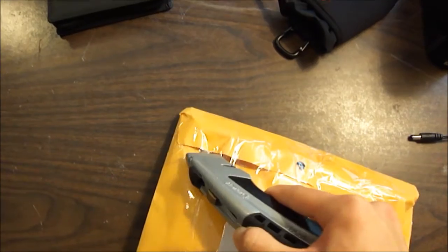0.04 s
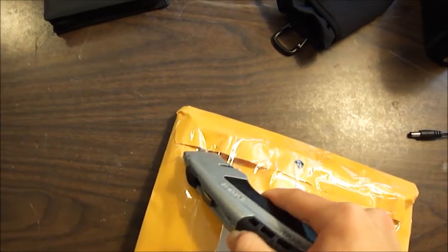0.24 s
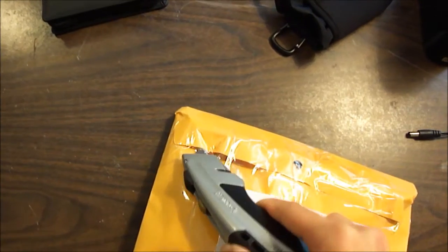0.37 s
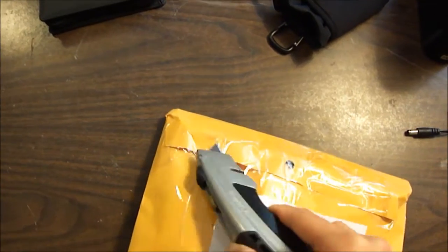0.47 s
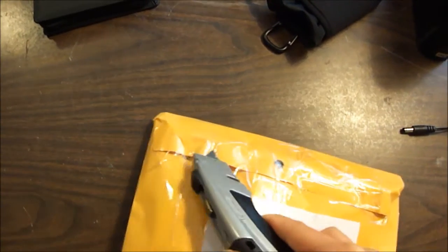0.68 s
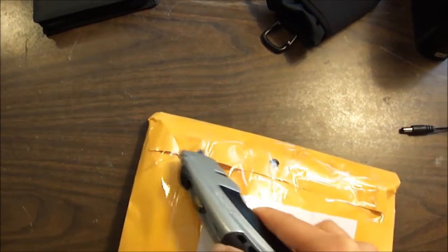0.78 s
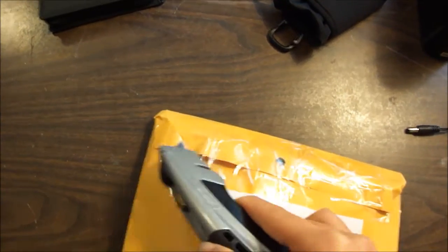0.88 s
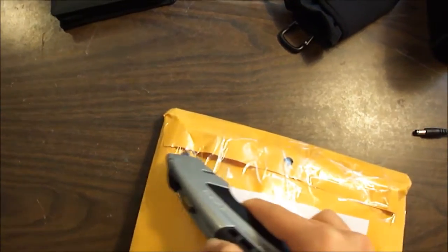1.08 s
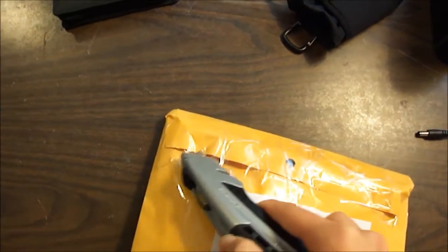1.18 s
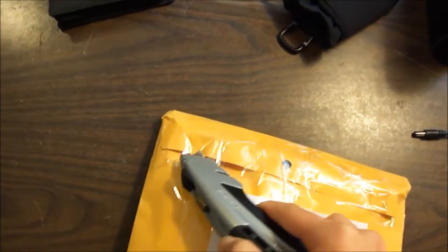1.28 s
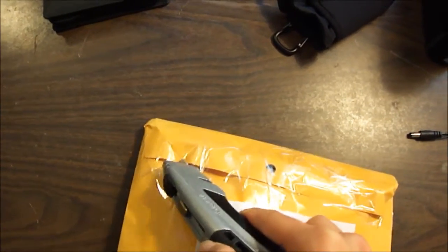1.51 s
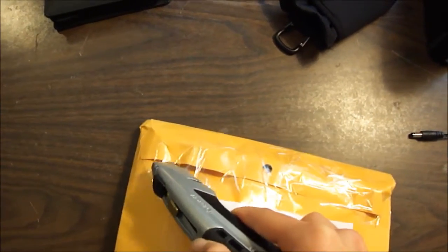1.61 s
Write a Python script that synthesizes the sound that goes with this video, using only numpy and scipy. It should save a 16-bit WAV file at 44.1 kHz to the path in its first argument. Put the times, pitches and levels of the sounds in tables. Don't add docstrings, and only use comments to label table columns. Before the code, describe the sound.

Paper and tape being cut open with a utility knife, sparse ticks building to a loud ripping crackle, then irregular snaps and softer rustling on a table, recorded close with faint steady room hiss.

```python
import sys
import numpy as np
from scipy import signal
from scipy.fft import rfft, irfft
from scipy.io import wavfile
from scipy.ndimage import uniform_filter1d

SR = 44100
rng = np.random.default_rng(int(sys.argv[2]) if len(sys.argv) > 2 else 0)


def gain_from_decibels(decibels):
    exponent = np.asarray(decibels, float) / 20
    return 10 ** exponent


def generate_wav(signal):
    frames = np.transpose(np.atleast_2d(signal))
    scaled = np.clip(frames, -1, 1) * 32767
    pcm = np.round(scaled).astype(np.int16)
    wavfile.write(sys.argv[1], SR, pcm)


N = 72765


def evened(x):
    return x / np.sqrt(np.mean(x ** 2) + 1e-20)


def peaked(x, db):
    return gain_from_decibels(db) * x / abs(x).max()


def add(mix, start_s, sound):
    start = max(round(start_s * SR), 0)
    part = mix[start:][:len(sound)]
    part += sound[:len(part)]


def read(points, hz):
    point_hz, value = np.transpose(points)
    return np.interp(np.log(hz + 1), np.log(point_hz + 1), value)


def colour(x, points):
    hz = np.fft.rfftfreq(len(x), 1 / SR)
    return irfft(rfft(x) * gain_from_decibels(read(points, hz)), len(x))


def resonate(x, hz, width_hz):
    r = np.exp(-np.pi * width_hz / SR)
    return signal.lfilter([1 - r, 0, r - 1], [1, -2 * r * np.cos(2 * np.pi * hz / SR), r * r], x)


def band(x, low_hz, high_hz):
    return signal.lfilter(*signal.butter(2, [low_hz, high_hz], "band", fs=SR), x)


# pitch_hz, width_hz,
# level_db
ENVELOPE_MODES = [(995, 160, -4), (1190, 200, 2.5), (1463, 606, -3.5), (1837, 236, 2.5), (2270, 800, -10),
                  (3550, 33, -6.5), (524, 244, -9.5)]


def hollow(x):
    rung = np.zeros(len(x))
    for k, (hz, width_hz, db) in enumerate(ENVELOPE_MODES):
        sign = (-1) ** k
        rung += sign * gain_from_decibels(db) * resonate(x, hz, width_hz)
    return band(rung, 600, 4000)


# pitch_hz, level_db
AIR_NOISE = [(18, -63), (30, -32.5), (237, -6.5), (296, -3.5), (610, -3), (674, -7), (822, -1.5),
             (9660, -20), (11500, -18), (15000, -65), (22000, -120)]


def room_air():
    return gain_from_decibels(-50.5) * evened(colour(rng.standard_normal(N), AIR_NOISE))


def slips(per_s, spread_db):
    size = gain_from_decibels(spread_db * np.minimum(rng.exponential(1, N), 2.5))
    happens = rng.random(N) < per_s / SR
    return size * rng.standard_normal(N) * happens


# time_s, level_db
HAND_PRESSURE = [(0, -38), (.07, -52.5), (.16, -53), (.23, -89), (.25, -55), (.36, -43.5), (.48, -32.5),
                 (.56, -42.5), (.75, -42.5), (.83, -100), (.95, -51), (1.0, -46), (1.2, -37.5), (1.27, -82),
                 (1.33, -48), (1.42, -44), (1.57, -44), (1.62, -48)]
# start_s, length_s, fizz_db, body_db, fizz_hz
TEARS = [(0.371, 0.017, -38, -42, 4700), (1.14, 0.05, -46.5, -50, 5600), (1.388, 0.042, -47.5, -41, 5700),
         (1.524, 0.016, -50, -36.5, 6500), (0.386, 0.026, -22.5, -19, 7350),
         (0.4178, 0.011, -24, -19.5, 5900), (0.44, 0.019, -22.5, -18, 4560),
         (0.457, 0.093, -46.5, -37, 4770), (0.6222, 0.0036, -23.5, -27, 5230),
         (0.6523, 0.0084, -32, -31, 5600), (0.7539, 0.0056, -32, -38, 3550), (0.972, 0.014, -35, -28, 2610),
         (1.074, 0.011, -38.5, -25, 3670), (1.117, 0.027, -35, -28, 4860), (1.182, 0.012, -48, -27.5, 3350),
         (1.2, 0.0133, -57, -35, 4860), (1.643, 0.0054, -36, -32.5, 9300)]
# pitch_hz, level_db
FIZZ_TONE = [(1180, -91), (2000, -4), (2720, -1.5), (3510, 1.5), (4220, -3), (10500, -6.5), (11500, -15),
             (15000, -59), (22000, -120)]


def paper():
    t = np.arange(N) / SR
    clump_db = 2 * evened(uniform_filter1d(rng.standard_normal((2, N)), 300))
    clump = gain_from_decibels(clump_db)
    press = gain_from_decibels(np.interp(t, *np.transpose(HAND_PRESSURE)))
    body = press * evened(clump[0] * slips(per_s=4000, spread_db=3))
    scrape = evened(np.sqrt(clump[1]) * rng.standard_normal(N))
    fizz = gain_from_decibels(-5.5) * press * scrape

    tear_slips = evened(slips(per_s=8000, spread_db=2.5))
    for start_s, length_s, fizz_db, body_db, fizz_hz in TEARS:
        progress = np.clip((t - start_s) / length_s, 0, 1)
        swell = np.sqrt(np.sin(np.pi * progress ** .6).clip(0))
        tear = tear_slips * swell
        ring = gain_from_decibels(7) * resonate(tear, fizz_hz, width_hz=700)
        fizz = fizz + gain_from_decibels(fizz_db) * (tear + ring)
        body = body + gain_from_decibels(body_db) * tear

    click = np.eye(1, N, N // 2)[0]
    bare = colour(fizz, FIZZ_TONE) / np.linalg.norm(colour(click, FIZZ_TONE))
    boxed = hollow(body) / np.linalg.norm(hollow(click))
    shove = gain_from_decibels(-34) * np.std(body) * evened(band(body, 80, 170))
    return shove + bare + boxed


def swelling(u):
    return u * np.exp(1 - u)


# start_s, peak_db, pitch_hz
THUDS = [
    (0.01, -61, 40),
    (0.38, -48, 130),
    (0.464, -52, 71),
    (0.62, -62, 45),
    (0.685, -62, 45),
    (0.75, -63, 45),
    (0.85, -56, 65),
]


def thuds():
    out, t = np.zeros(N), np.arange(6000) / SR
    for start_s, peak_db, hz in THUDS:
        swell_s = 0.62 / 3 / hz
        add(out, start_s, gain_from_decibels(peak_db) * swelling(t / swell_s) * np.sin(2 * np.pi * hz * t))
    return out


# start_s, tick_db, body_db, tick_hz, body_hz
PIERCING_SNAPS = [(0.029, -26, -48, 4930, 1840), (0.0848, -32.5, -47, 6050, 1960),
                  (0.088, -31, -53, 3400, 1160), (0.1185, -23.5, -33, 10200, 2500),
                  (0.1265, -27, -34, 3100, 2000), (0.1396, -30.5, -40, 3450, 1310),
                  (0.2367, -12, -14, 4400, 2150), (0.2454, -26, -29, 3000, 1430),
                  (0.275, -29.5, -32, 5060, 1240), (0.2814, -27, -26, 3470, 1690),
                  (0.3075, -16.5, -33, 3650, 1130), (0.3138, -30, -26, 3480, 1140),
                  (0.3458, -20.5, -31, 3570, 1090), (0.3705, -33, -43, 4860, 1100),
                  (0.381, -15.5, -23.5, 9700, 1040), (0.4198, -5, -17, 5950, 1190),
                  (0.4374, -13, -15, 5000, 1920), (0.4733, -12.5, -17, 9700, 1290)]
# start_s, tick_db, body_db, tick_hz, body_hz
CUTTING_SNAPS = [(0.5633, -25, -27, 3940, 1000), (0.5715, -14.5, -21.5, 6520, 1330),
                 (0.5911, -9, -30, 6050, 1220), (0.6122, -32, -25, 3070, 2140),
                 (0.6214, -8.5, -27, 5250, 1270), (0.6472, -31, -23, 4720, 1640),
                 (0.6613, -8.5, -23.5, 6240, 1980), (0.6875, -16.5, -19, 4940, 2100),
                 (0.7058, -20, -46, 3540, 1190), (0.7195, -19, -23.5, 4000, 1040),
                 (0.7544, -9, -12, 4750, 2150), (0.8014, -33, -23, 3360, 712),
                 (0.8521, -23.5, -41, 3560, 870), (0.969, -21, -24.5, 7450, 2540),
                 (0.9732, -19.5, -19.5, 5460, 860), (0.9786, -16, -27, 8160, 1800),
                 (0.9915, -16.5, -21, 4830, 1190), (1.0262, -19.5, -42, 5030, 1190),
                 (1.0736, -8, -28, 10200, 1210), (1.0778, -25, -18.5, 3800, 1070)]
# start_s, tick_db, body_db, tick_hz, body_hz
SHIFTING_SNAPS = [(1.1191, -10.5, -14.5, 3000, 1120), (1.1256, -17, -23.5, 9500, 1120),
                  (1.142, -21, -26, 4500, 960), (1.1611, -40, -33, 5130, 1680),
                  (1.1815, -38, -24.5, 6700, 1420), (1.1854, -33, -41, 3150, 1220),
                  (1.1972, -22, -48, 9430, 1130), (1.2024, -16.5, -45, 10670, 1060),
                  (1.2074, -45, -26, 3440, 1180), (1.3859, -22, -22.5, 7400, 1960),
                  (1.3914, -19.5, -27, 3620, 1630), (1.4313, -45, -25, 5990, 1326),
                  (1.5112, -33, -30, 3000, 1240), (1.5326, -37, -26.5, 3096, 1850),
                  (1.5464, -23, -37, 5000, 1580), (1.5557, -12.5, -22, 8900, 2190),
                  (1.63, -33, -34, 3370, 1030), (1.6434, -40, -36, 4900, 1210)]


def snaps(table):
    tick_rise_s, knock_rise_s = 0.00036, 0.00051
    tick_t60_s, knock_t60_s = 0.007, 0.018
    tick_width_hz, knock_width_hz = 800, 380
    out, t = np.zeros(N), np.arange(1600) / SR
    noise = rng.standard_normal((len(table), 2, len(t)))
    high = signal.butter(2, 2400, "high", fs=SR)
    tick_rise = np.minimum(t / tick_rise_s, 1)
    knock_rise = np.minimum(t / knock_rise_s / 3, 1)
    tick_fade = tick_rise * np.exp(-np.pi * tick_width_hz * t)
    knock_fade = knock_rise * np.exp(-np.pi * knock_width_hz * t)
    push = t / knock_rise_s * np.exp(-t / knock_rise_s * 4)

    for (start_s, tick_db, body_db, tick_hz, body_hz), (hiss, rattle) in zip(table, noise):
        ring = tick_fade * np.sin(2 * np.pi * tick_hz * t)
        crack = signal.lfilter(*high, hiss * tick_rise * gain_from_decibels(-60 * t / tick_t60_s))
        tick = evened(ring) + gain_from_decibels(5.5) * evened(crack)

        own = knock_fade * np.sin(2 * np.pi * body_hz * t)
        jolt = evened(push) + .5 * evened(rattle * gain_from_decibels(-60 * t / knock_t60_s))
        knock = evened(own) + gain_from_decibels(-6) * evened(hollow(jolt))

        add(out, start_s, peaked(tick, tick_db))
        add(out, start_s, peaked(knock, body_db))
    return out


# start_s, peak_db, pitch_hz, swell_ms
RINGS = [(0.237, -23, 1225, 1.43), (0.3715, -25.5, 1110, 2.1), (0.3855, -15, 1130, 1.5),
         (0.391, -8.5, 1046, 1.34), (0.3935, -12, 6600, 0.37), (0.396, -14, 1884, 2.5),
         (0.399, -22, 7000, .35), (0.4025, -9.5, 1115, 1.33), (0.4027, -15, 3570, .3),
         (0.4195, -10, 1950, 0.49), (0.4225, -18.5, 3390, 1.8), (0.423, -15, 1220, 0.58),
         (0.445, -9, 1855, 1.34), (0.448, -9, 1210, 1.6), (0.45, -24, 5000, .5), (0.4535, -15.5, 1760, 1.2),
         (0.4565, -8.5, 1180, 0.75), (0.7553, -17, 10530, 0.45), (0.755, -23, 6810, 0.62),
         (0.7552, -22.5, 3617, 1.02), (0.6228, -9, 5100, 0.33), (0.6232, -13.5, 7000, 0.43),
         (0.655, -19, 4870, 0.53), (0.656, -22, 7070, 1.1), (0.658, -27, 1980, 0.96),
         (1.121, -17.5, 1063, 1.9), (1.187, -18.5, 1240, 1.3), (1.1864, -19, 1900, .7),
         (1.387, -25, 3010, 0.47), (1.6465, -27, 1045, 1.2), (0.9787, -21, 5580, 0.36),
         (0.9828, -19.5, 1075, 1.8), (1.074, -24, 3660, 1.05), (1.0825, -27.5, 1080, 1.3),
         (1.1095, -26, 1150, 1.4), (1.128, -17.5, 1115, 1.3), (1.1285, -29, 5220, .6),
         (1.135, -26, 1073, 1.6), (1.139, -22.5, 1077, 2), (1.344, -33, 1160, .8), (1.386, -21, 1780, 1.3),
         (1.431, -23, 1300, 0.85), (1.5559, -23, 5270, 0.75), (1.644, -33, 1020, 2.4),
         (0.802, -27, 328, 1.8), (1.5112, -27, 2000, 0.41), (0.4374, -18, 2040, .5),
         (0.8015, -29, 1480, .5)]


def rings():
    out, t = np.zeros(N), np.arange(1600) / SR
    for start_s, peak_db, hz, swell_ms in RINGS:
        swell = swelling(t / (swell_ms / 1000))
        add(out, start_s, gain_from_decibels(peak_db) * swell * np.sin(2 * np.pi * hz * t))
    return out


# start_s, peak_db, pitch_hz
BUMPS = [(0.446, -20.5, 604), (0.457, -17.5, 633), (0.623, -37.5, 472), (0.684, -31.5, 443),
         (0.752, -38, 503), (0.801, -22.5, 508), (0.877, -43, 540), (0.974, -30, 494), (0.982, -25.5, 517),
         (1.078, -26, 780), (1.12, -29.5, 390), (1.431, -36, 522)]


def bumps():
    rise_s, t60_s, table_hz = 0.00067, 0.029, 359
    out, t = np.zeros(N), np.arange(4000) / SR
    fade = (1 - np.exp(-t / rise_s)) ** 2 * gain_from_decibels(-60 * t / t60_s)
    table_top = gain_from_decibels(-6) * np.sin(2 * np.pi * table_hz * t)
    for start_s, peak_db, hz in BUMPS:
        lower = np.sin(2 * np.pi * hz * t)
        upper = gain_from_decibels(-4.5) * np.sin(2 * np.pi * hz * 1.564 * t)
        add(out, start_s, peaked(fade * (lower + upper + table_top), peak_db))
    return signal.lfilter(*signal.butter(2, 200, "high", fs=SR), out)


def slide():
    start_s, length_s = 1.34, 0.29
    out, t = np.zeros(N), np.arange(0, length_s, 1 / SR)
    hiss = evened(resonate(rng.standard_normal(len(t)), 5270, width_hz=1900))
    swell = np.sqrt(np.sin(np.pi * t / length_s))
    add(out, start_s, gain_from_decibels(-52.5) * swell * hiss)
    return out


# pitch_hz, fade_s
ROOM_FADE = [(200, 0.63), (1000, 0.23), (4000, 0.18), (10000, 0.1)]


def room(x):
    echoes = np.zeros(SR)
    at = np.arange(200, SR - 20, 20)
    echoes[at + rng.integers(0, 20, len(at))] = rng.choice([-1., 1.], len(at))
    hz, t, bands = signal.stft(echoes, SR, nperseg=256)
    fade = gain_from_decibels(-60 * t / read(ROOM_FADE, hz)[:, None])
    tail = signal.istft(bands * fade, SR, nperseg=256)[1]
    return signal.fftconvolve(x, tail / np.linalg.norm(tail))[:N]


def scene():
    air = room_air()
    near = paper() + thuds() + rings() + bumps() + slide()
    for table in (PIERCING_SNAPS, CUTTING_SNAPS, SHIFTING_SNAPS):
        near = near + snaps(table)
    return (near + gain_from_decibels(-15) * room(near) + air)[None]


# pitch_hz, level_db
CAMERA_TONE = [(2450, -0.5), (2900, -2.5), (3550, -0.5), (4200, -2), (4800, -0.5), (11050, -2),
               (11250, -35), (12300, -39)]


def camera(x):
    return colour(x, CAMERA_TONE)


def band_limit(x):
    return signal.sosfilt(signal.butter(12, 12290, fs=SR, output="sos"), x)


def record(dry):
    mix = camera(dry[0])[None]
    return band_limit(mix)


dry = scene()
out = record(dry)
generate_wav(out)
```